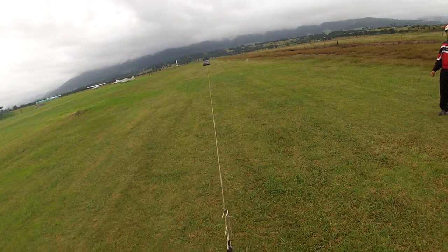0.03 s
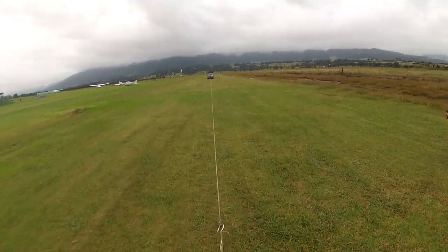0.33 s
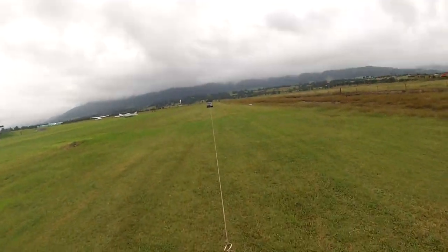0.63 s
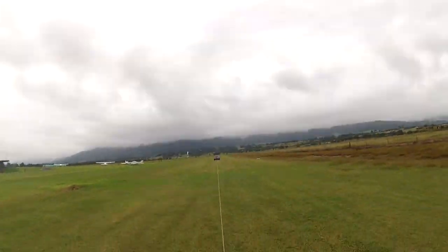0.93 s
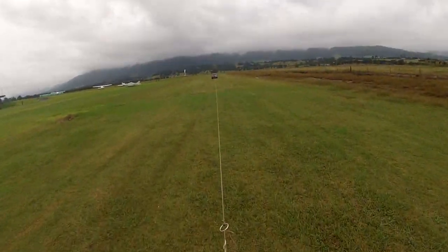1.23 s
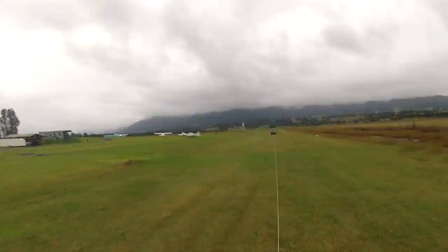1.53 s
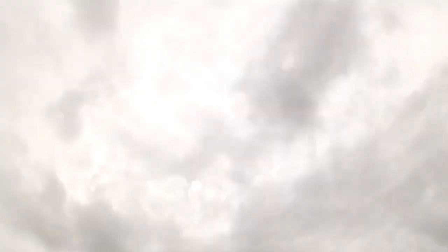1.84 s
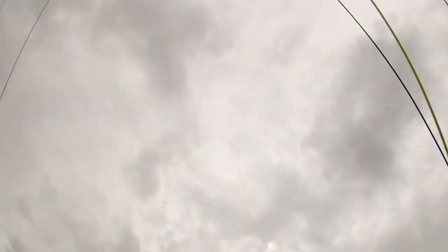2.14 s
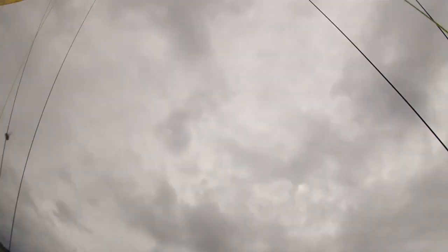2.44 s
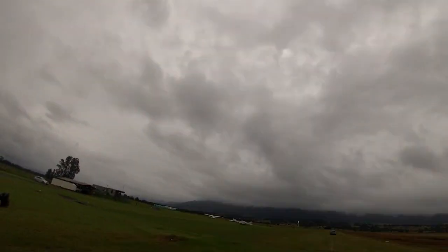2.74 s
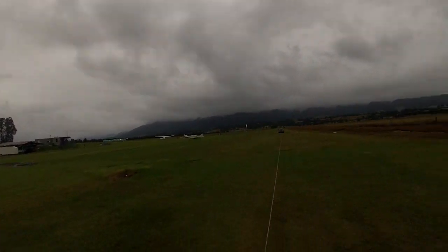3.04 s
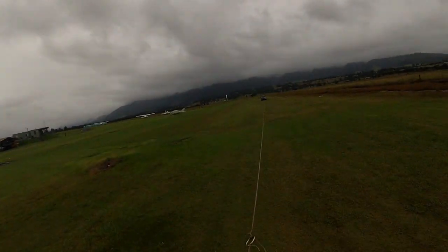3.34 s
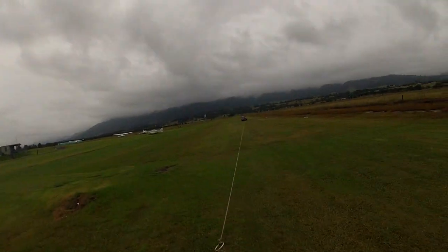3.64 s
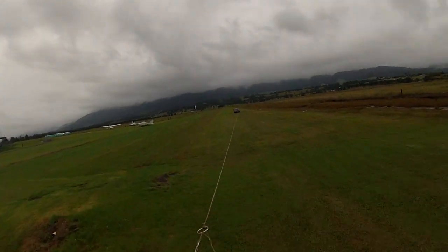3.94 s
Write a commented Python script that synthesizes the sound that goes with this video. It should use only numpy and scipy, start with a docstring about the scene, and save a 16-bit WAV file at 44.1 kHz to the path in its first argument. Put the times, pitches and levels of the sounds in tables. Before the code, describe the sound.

Low gusts of wind buffet a microphone worn on the body outdoors, over soft rustling of clothing and straps. A sharp clack comes midway, then a brief squeak, and the rushing air builds toward heavy, close knocks.

```python
"""Wind buffets a body-worn camera on an open field: turbulent eddies press on the microphone,
make it crackle and shake the mount, which hums at its resonance. Friction makes cloth swish and
straps rub; hardware clacks in its natural modes and squeaks once as it slips. The rush of air
grows until two heavy knocks set the mount ringing and overload the microphone."""
import sys
import numpy as np
from scipy import signal
from scipy.fft import rfft, irfft
from scipy.io import wavfile
from scipy.ndimage import uniform_filter1d

SR = 44100
rng = np.random.default_rng(int(sys.argv[2]) if len(sys.argv) > 2 else 0)


def int16_out(signal):
    """Quantize to a 16-bit WAV file."""
    q = np.round(np.clip(np.atleast_2d(signal).T, -1, 1) * 32767)
    wavfile.write(sys.argv[1], SR, q.astype(np.int16))


N = 176400
T = np.arange(N) / SR

# spectra of hiss, light cloth, straps and dull bursts (f/Hz, relative level/dB)
HISS_SPECTRUM = [(2500,-5.5),(12000,-4.5),(15000,-12.5)]
CLOTH_SPECTRUM = [(500,-3),(950,-4.5),(1420,9),(1700,0.5),(2200,6),(3800,-4.5),(4800,-4),(5700,-9),(7100,-6),(8600,-13.5),(15000,-21.5)]
STRAP_SPECTRUM = [(300,-2.5),(950,-8.5),(1450,-5),(1700,-9.5),(2100,8),(2500,0.5),(2850,-7),(5000,-20),(15000,-54)]
BURST_SPECTRUM = [(150,1),(350,4.5),(1500,-17),(12000,-41)]
# envelope of the rustling cloth (t/s, level/dB)
CLOTH_ENVELOPE = [(.4,-58),(.75,-49.5),(1,-47),(1.53,-52),(2.25,-50),(3.65,-63)]
# strokes of cloth and straps (centre t/s, duration/s, level/dB)
CLOTH_SWIPES = [(1.1,0.13,-49.5),(1.36,0.12,-47),(3.88,0.093,-44.5)]
STRAP_RUBS = [(.273,0.03,-46.5),(1,0.032,-44),(1.66,0.11,-47),(1.85,0.1,-40.5),(2.12,0.092,-39.5),(2.66,0.15,-47.5)]
# dull brushes and soft scuffs of cloth on the housing (centre t/s, duration/s, level/dB)
DULL_BURSTS = [(.289,.008,-30),(.568,0.0099,-31.5),(.595,0.012,-36.5),(.652,0.018,-43.5),(1,0.042,-45),(1.585,0.024,-46),(1.86,.03,-41.5)]
# three sharp microphone crackles in the gusts, then small ticks (t/s, peak level/dB, T60/s)
SHARP_PULSES = [(.288,-21,0.02),(.568,-26,0.0053),(.592,-26,0.0056),(2.348,-13.5,0.0013),(2.38,-30,.004),(3.7713,-24,0.0023),(3.795,-22.5,.002)]
# hardware striking the camera (t/s, peak level/dB)
HARDWARE_IMPACTS = [(1.7921,2),(1.7947,-14)]
# blows on the mount (t/s, mount peak level/dB, housing peak level/dB)
MOUNT_IMPACTS = [(1.794,-13.5,-13.5),(2.348,-9,-30),(3.768,1,-14),(3.7706,-8,-6),(3.7874,-4,-13.5),(3.976,-12,-27.5)]
# natural modes of the struck bodies (f/Hz, relative level/dB, T60/s)
BUCKLE_MODES = [(1343,0,0.083),(1440,-1,0.19)]
HARDWARE_MODES = [(528,3.5,0.029),(756,-6.5,0.036),(1205,0.5,0.016),(1420,8,0.0088),(1870,4.5,0.013),(2293,5.5,0.015),(3450,-8.5,0.02),(4480,-6,0.026),(5940,-11.5,0.017)]
MOUNT_MODES = [(105.5,9,0.1),(157,-1.5,0.098),(204,-5.5,0.059),(323.8,-8,0.08)]
HOUSING_MODES = [(510,-4,0.02),(678,-5,0.032),(910,-0.5,0.021),(1201,-0.5,0.021),(2136,-4.5,0.018)]
# contact noise of the squeak, clacks and knocks (f/Hz, relative level/dB)
RASP_SPECTRUM = [(400, -14), (1500, 6), (3100, -6.5), (3850, 8), (5100, -16), (6300, 0),
                 (8000, -20), (10500, -21), (12000, -36), (16000, -38)]
CRACK_SPECTRUM = [(2000, -5), (5000, -6), (10000, -24), (16000, -48)]
SCUFF_SPECTRUM = [(2500, 0), (4000, -20.5), (15000, -62)]
# spectra of rushing air and of eddies at the microphone (f/Hz, relative level/dB)
RUSH_SPECTRUM = [(150,4),(330,7.5),(520,1),(950,-6),(1480,-1),(2250,-1),(3100,-14),(6200,-25),(9000,-55)]
EDDY_SPECTRUM = [(18,2),(28,-5),(62,-14.5),(90,-28.5),(150,-55),(400,-57),(1500,-99.5)]
# envelopes of the rush, and of mount vibration and eddies between gusts (t/s, level/dB)
RUSH_ENVELOPE = [(.1,-57.5),(1.5,-56.5),(2.42,-48.5),(3.1,-47),(3.73,-37),(3.82,-39),(3.93,-33),(4,-36)]
SHAKE_ENVELOPE = [(.3,-41.5),(1.5,-46.5),(1.59,-25.5),(1.7,-38),(2.7,-28.5),(3.5,-33.5),(3.9,-21.5),(3.98,-26.5)]
BREEZE_ENVELOPE = [(.1,-26),(.9,-20.5),(1.55,-29),(1.9,-21),(3.3,-23.5)]
# single lumps of air (centre t/s, duration/s, peak level/dB)
AIR_PULSES = [(0.292,.021,-3.5),(0.603,0.024,-5.5),(2.613,0.0273,-7.5)]
# gusts on the microphone (centre t/s, duration/s, level before saturation/dB)
WIND_GUSTS = [(.57,0.07,-10.5),(.88,0.13,-11.5),(1.13,0.13,-13.5),(1.75,0.08,-14),(2.08,0.29,-13),(2.34,0.088,-8),(3.02,0.14,-15),(3.97,0.03,-15)]


def undb(db):
    """Amplitude ratio of a level in dB."""
    return 10 ** (np.asarray(db) / 20)


def unit(x):
    """Normalisation to rms 1."""
    return x / np.sqrt(np.mean(x ** 2))


def curve(rows):
    """Amplitude envelope interpolated through (t/s, level/dB)."""
    return undb(np.interp(T, *np.array(rows).T))


def swells(rows):
    """Superposed Gaussian envelopes; each duration spans two standard deviations."""
    return sum(undb(db) * np.exp(-2 * ((T - at) / duration) ** 2) for at, duration, db in rows)


def fade(at, t60):
    """Exponential decay from a sudden onset, by 60 dB in t60 seconds."""
    return (T >= at) * np.exp(-np.log(1000) * np.maximum(T - at, 0) / t60)


def colour(x, spectrum):
    """Spectral shaping by (f/Hz, level/dB), rolled off below 10 Hz; rms 1."""
    hz, db = np.array(spectrum).T
    f = np.maximum(np.arange(N // 2 + 1) * SR / N, 1)
    gain = undb(np.interp(np.log(f), np.log(hz), db))
    low_cut = np.minimum(f / 10, 1) ** 2
    return unit(irfft(rfft(x) * gain * low_cut, N))


def resonate(x, hz, width_hz):
    """Forced response of a second-order resonator."""
    return signal.lfilter(*signal.iirpeak(hz, hz / width_hz, SR), x)


def noise():
    """White Gaussian noise."""
    return rng.standard_normal(N)


def wander(rate_hz):
    """Band-limited random fluctuation of rms 1."""
    return colour(noise(), [(rate_hz / 10, 0), (rate_hz, 0), (rate_hz * 2, -80)])


def grainy_noise(depth_db, rate_hz):
    """Random amplitude modulation breaks noise into grains."""
    return noise() * undb(depth_db * wander(rate_hz))


def steady(x, window_s):
    """Division by the running rms evens out slow swells and leaves quick fluctuations."""
    power = uniform_filter1d(x ** 2, int(window_s * SR))
    return x / np.sqrt(power + 1e-3)


def ring(at, modes):
    """Free vibration after an impact: damped modes of alternating sign superpose; peak 1."""
    age = np.arange(SR // 2) / SR
    y = sum((-1) ** k * undb(db - 60 * age / t60) * np.sin(2 * np.pi * hz * age)
            for k, (hz, db, t60) in enumerate(modes))
    return np.concatenate([np.zeros(int(at * SR)), y / np.abs(y).max(), np.zeros(N)])[:N]


def hiss(level_db=-64):
    """Stationary broadband noise forms a faint floor."""
    return undb(level_db) * colour(noise(), HISS_SPECTRUM)


def cloth():
    """Sliding friction: cloth and straps catch and slip in tiny grains."""
    swish = colour(grainy_noise(depth_db=1.2, rate_hz=34), CLOTH_SPECTRUM)
    swish *= np.hypot(curve(CLOTH_ENVELOPE), swells(CLOTH_SWIPES))
    rubs = swells(STRAP_RUBS) * colour(grainy_noise(depth_db=2.5, rate_hz=182), STRAP_SPECTRUM)
    return swish + rubs


def dull_bursts():
    """Short noise bursts: cloth brushes and scuffs dully against the housing."""
    return swells(DULL_BURSTS) * colour(noise(), BURST_SPECTRUM)


def crackles_and_ticks(link_db=-33):
    """Transients: microphone crackle under wind pressure, later dry ticks and one of a metal link."""
    snaps = sum(undb(db) * fade(at, t60) for at, db, t60 in SHARP_PULSES)
    link = unit(resonate(noise(), hz=9330, width_hz=933)) * fade(at=2.2518, t60=0.011)
    return snaps + undb(link_db) * link


def buckle(peak_db=-34):
    """Two lightly damped modes of a buckle ring once."""
    return undb(peak_db) * ring(at=2.452, modes=BUCKLE_MODES)


def squeak(at=2.3374, start_hz=2494, sag_per_s=10.4, level_db=-9.5):
    """Friction of hardware slipping under load: two fluttering tones sag in pitch over a rasp."""
    age = np.maximum(T - at, 0)

    def envelope(t60, attack_s=0.0021, hold_s=0.011):
        return np.minimum(age / attack_s, 1) * undb(-60 * np.maximum(age - hold_s, 0) / t60)

    hz = start_hz * np.exp(-sag_per_s * age) * (1 + 0.049 * wander(rate_hz=490))
    phase = 2 * np.pi * np.cumsum(hz) / SR
    tones = np.sin(phase) + undb(-8) * np.sin(0.75 * phase)  # a fourth apart
    flutter = 1 + 0.59 * np.tanh(wander(rate_hz=273))
    rasp = undb(-13) * colour(noise(), RASP_SPECTRUM)
    return undb(level_db) * (tones * flutter * envelope(t60=0.03) + rasp * envelope(t60=0.012))


def clacks():
    """Impulsive excitation: hard contacts ring the hardware's modes with a bright crack."""
    crack = undb(-16) * colour(noise(), CRACK_SPECTRUM)
    return sum(undb(db) * (ring(at, HARDWARE_MODES) + crack * fade(at, t60=0.014))
               for at, db in HARDWARE_IMPACTS)


def knocks():
    """Modal response to dull blows: the mount booms, and the housing rattles with a scuff."""
    scuff = undb(-16) * colour(noise(), SCUFF_SPECTRUM)
    blows = np.zeros(N)
    for at, mount_db, housing_db in MOUNT_IMPACTS:
        rattle = ring(at, HOUSING_MODES) + scuff * fade(at, t60=0.04)
        blows += undb(mount_db) * ring(at, MOUNT_MODES) + undb(housing_db) * rattle
    return blows


def air_rush():
    """Broadband flow noise flickers as it grows."""
    return colour(grainy_noise(depth_db=1.42, rate_hz=37.5), RUSH_SPECTRUM) * curve(RUSH_ENVELOPE)


def mount_hum(hz=103, width_hz=17.5, coupling_db=-18.5):
    """Forced vibration: shaken at random, the mount hums at its resonance, louder in gusts."""
    vibration = resonate(resonate(noise(), hz, width_hz), hz, 2 * width_hz)
    drive = np.hypot(curve(SHAKE_ENVELOPE), undb(coupling_db) * swells(WIND_GUSTS))
    return steady(unit(vibration), window_s=0.075) * drive


def air_pulses():
    """Bipolar pressure pulses: each lump of air pulls, then pushes on the microphone."""
    pressure = np.zeros(N)
    for at, duration, db in AIR_PULSES:
        u = 2 * (T - at) / duration
        pressure += undb(db) * u * np.exp((1 - u ** 2) / 2)
    return pressure


def wind_buffeting(ceiling=0.5):
    """Turbulent pressure on the microphone: breeze and gusts add in power; strong eddies saturate."""
    eddies = steady(colour(noise(), EDDY_SPECTRUM), window_s=0.071)
    strength = np.hypot(swells(WIND_GUSTS), curve(BREEZE_ENVELOPE))
    return ceiling * np.tanh(eddies * strength / ceiling)


def scene():
    """Superposition of hiss, wind, gear sounds and microphone crackle in one channel."""
    floor = hiss()
    wind = wind_buffeting() + mount_hum() + air_rush() + air_pulses()
    rustle = cloth()
    transients = dull_bursts() + clacks() + knocks() + buckle() + crackles_and_ticks() + squeak()
    return (floor + wind + rustle + transients)[None]


def record(dry, start_s=0.067, rise_s=0.0062, cutoff_hz=15600):
    """Clipping and band limiting: after a short silence the sound sets in, overloads at full scale and loses
    the top."""
    opened = np.clip((T - start_s) / rise_s, 0, 1)
    low_pass = signal.ellip(8, 0.2, 70, cutoff_hz, fs=SR, output="sos")
    return signal.sosfilt(low_pass, np.clip(dry * opened, -1, 1))


dry = scene()
out = record(dry)
int16_out(out)
```